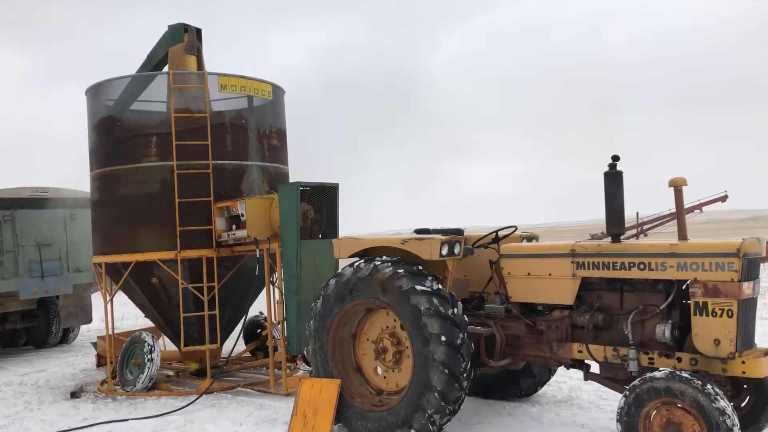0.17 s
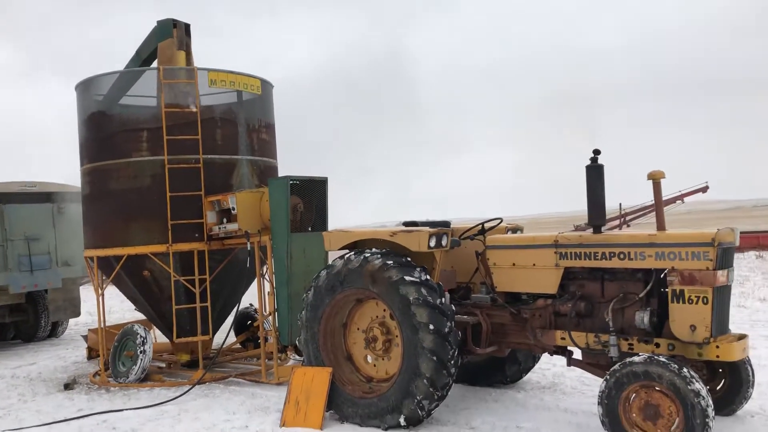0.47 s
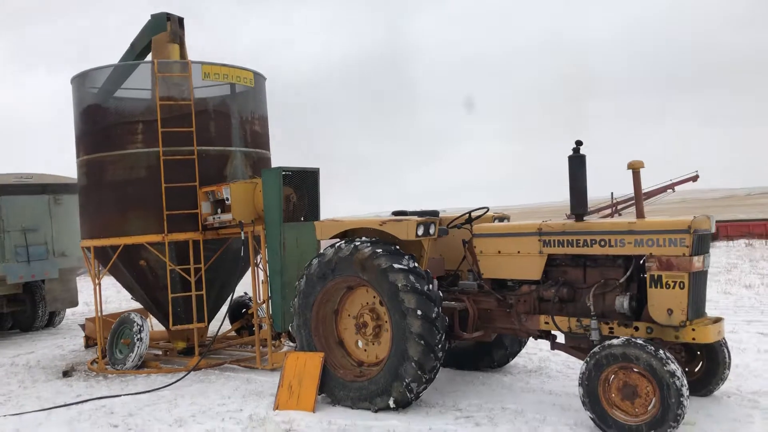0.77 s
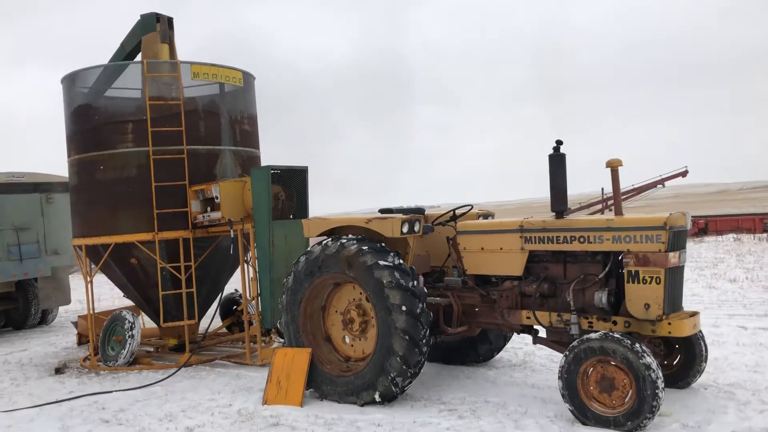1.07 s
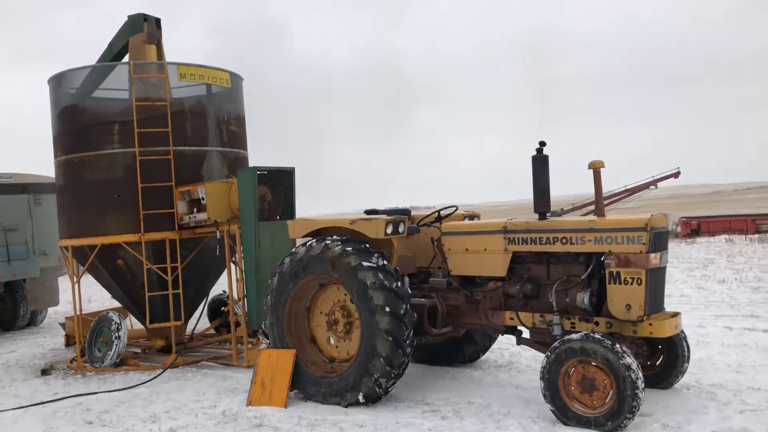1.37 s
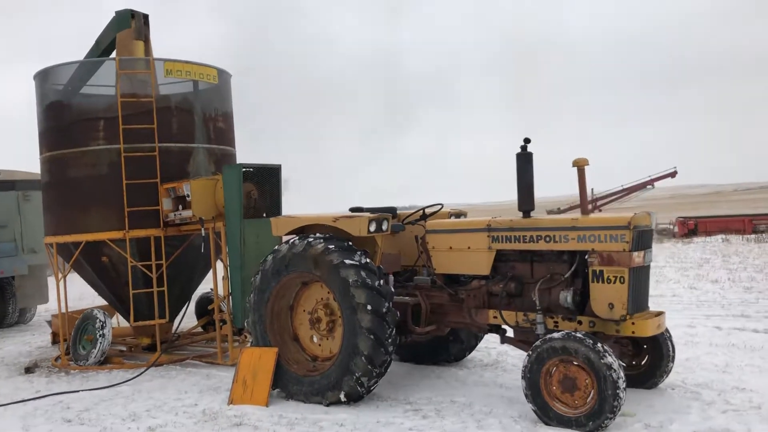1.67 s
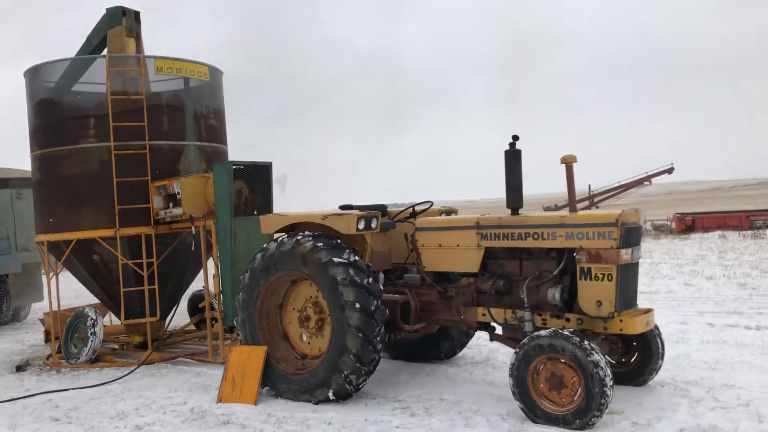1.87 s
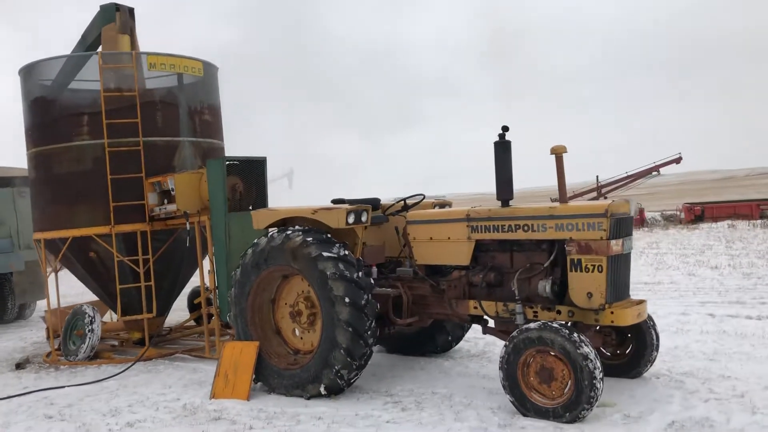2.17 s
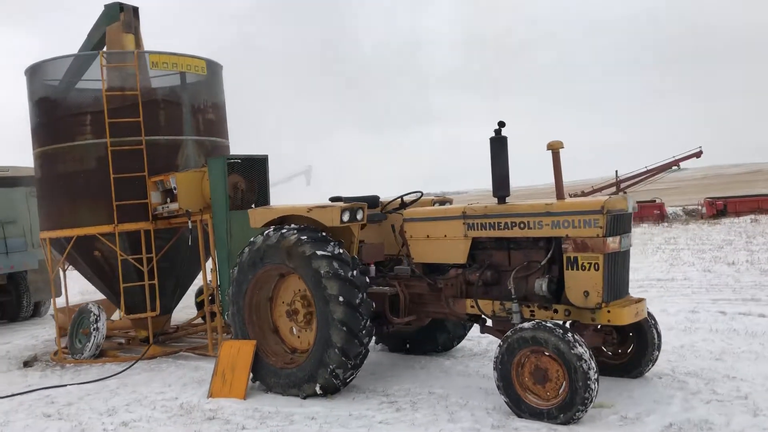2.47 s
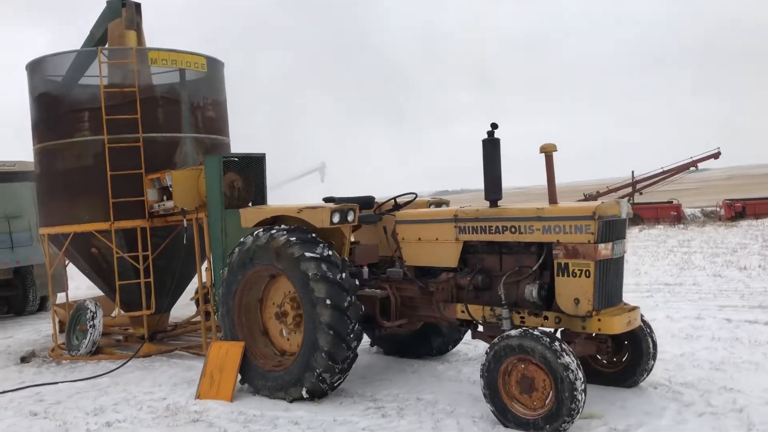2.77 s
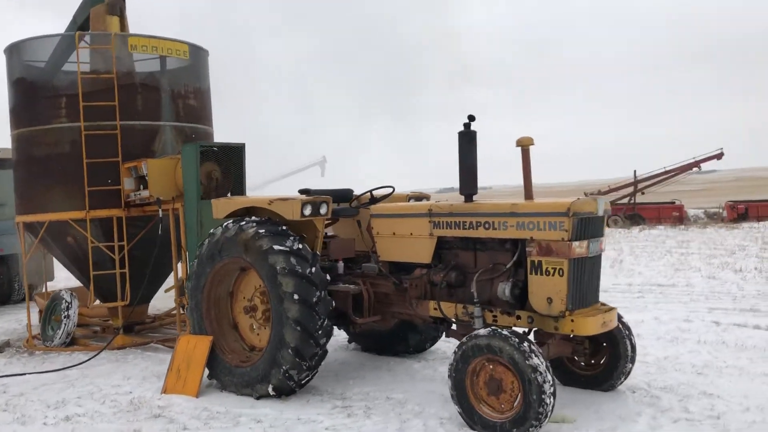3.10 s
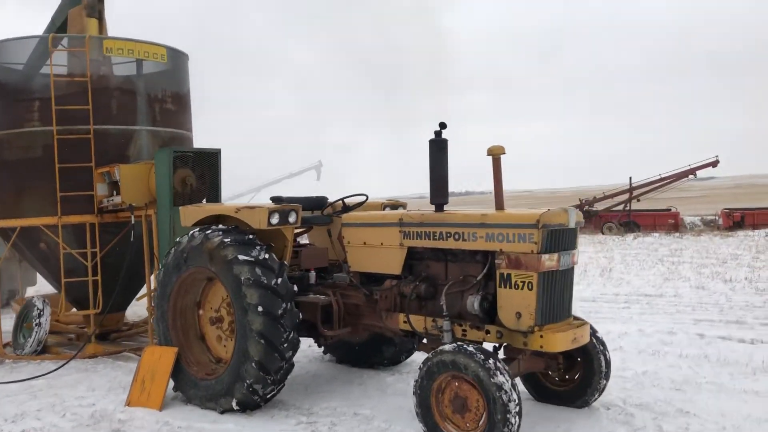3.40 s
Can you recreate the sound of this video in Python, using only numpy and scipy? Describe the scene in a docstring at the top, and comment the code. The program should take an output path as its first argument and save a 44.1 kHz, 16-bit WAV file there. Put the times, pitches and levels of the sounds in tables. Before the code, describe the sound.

An old tractor engine knocks and throbs steadily beside a grain dryer whose fan drones over rushing air and a low burner rumble; sharp metal ticks join, outdoors in an open farmyard, heard by a moving nearby microphone.

```python
"""An old four-cylinder tractor drives a grain dryer in an open, snowy farmyard.
From the start the engine throbs and knocks, while the dryer's fan drones over rushing air and a burner.
Sharp metal ticks, made of short noise bursts, soon join in. Near 1.4 s drone and knocks are weak.
The burner is strongest near 1.75 s and then fades; the knocks return near 1.8 s, then the drone.
Engine tones and knocks are sines; the drone is two fluttering tones; air and burner are shaped noise."""
import sys
import numpy as np
from scipy import signal
from scipy.fft import rfft, irfft
from scipy.io import wavfile

SR = 44100
rng = np.random.default_rng(int(sys.argv[2]) if len(sys.argv) > 2 else 0)


def store_pcm(level_fs):
    """Save levels as 16-bit WAV."""
    pcm = np.round(np.clip(level_fs, -1, 1) * 32767).astype(np.int16)
    wavfile.write(sys.argv[1], SR, np.atleast_2d(pcm).T)


N = 156114  # length of the scene in samples


def amp(db):
    """Turns decibels into a gain."""
    return 10 ** (np.asarray(db) / 20)


def unit(x):
    """Scales a signal to an rms (average strength) of 1."""
    return x / np.sqrt(np.mean(abs(x) ** 2) + 1e-20)


def clock():
    """Gives the time of every sample in seconds."""
    return np.arange(N) / SR


def curve(rows, axis=1):
    """Joins one column of a table by straight lines in time."""
    rows = np.array(rows)
    return np.interp(clock(), rows[:, 0], rows[:, axis])


def noise(spectrum):
    """Makes noise of rms 1; only the shape of the spectrum counts, not its overall level."""
    hz, db = np.transpose(spectrum)
    bins_hz = np.fft.rfftfreq(N, 1 / SR)
    shape_db = np.interp(np.log(bins_hz + 1), np.log(hz), db)
    white = rng.standard_normal(N)
    return unit(irfft(rfft(white) * amp(shape_db), N))


def band(hz, width_hz):
    """Makes noise of rms 1 in one resonance; at 0 Hz it is a slow random drift."""
    off = (np.fft.rfftfreq(N, 1 / SR) - hz) / width_hz
    white = rng.standard_normal(N)
    return unit(irfft(rfft(white) / (1 + 2 * off ** 2), N))


def cycles():
    """Counts the engine cycles turned since the first knock."""
    # engine speed: t/s, four-stroke cycles per second/Hz
    speed = [(0, 9.597), (1.7, 9.597), (2.4, 9.635), (3.54, 9.645)]
    first_cycle_s = .033
    turned = np.cumsum(curve(speed)) / SR
    return turned - np.interp(first_cycle_s, clock(), turned)


def firings():
    """Counts the firings since the first knock: four cylinders fire in each cycle."""
    return 4 * cycles()


def throb(at, sharp):
    """Swells once with every firing, at the given share of the firing interval; rms 1."""
    return unit(np.exp(sharp * np.cos(2 * np.pi * (firings() - at))))


def exhaust_note():
    """Adds sines at multiples of the firing rate to form the low exhaust pulse."""
    # overtones of the pulse: multiple of the firing rate, level/dB
    exhaust = [(1, -53.5), (2, -33), (3, -39.5), (4, -39.5), (5, -43), (6, -35.5), (7, -41.5), (8, -38)]
    pulse_at = -.09  # share of the firing interval
    angle = 2 * np.pi * (firings() - pulse_at)
    # the root of 2 gives each sine the rms of its level
    return sum(amp(db) * np.sqrt(2) * np.sin(multiple * angle) for multiple, db in exhaust)


def engine():
    """Each firing gives a low exhaust pulse, a puff of gas and a clatter of the engine block."""
    # spectrum of the gas puffs: f/Hz, relative level/dB
    puff = [(40, -40), (90, -19), (125, 4), (160, -4), (220, -5), (400, 2), (700, -8), (1400, -11),
            (6000, -55)]
    # spectrum of the block's clatter: f/Hz, relative level/dB
    clatter = [(500, -15), (1100, -25), (1800, 5.5), (2400, -13.5), (3150, -4), (5000, -11.5), (9000, -17),
               (16000, -40)]
    puffs = amp(-31) * noise(puff) * throb(at=0.815, sharp=0.94)
    clatters = amp(-32) * noise(clatter) * throb(at=0.98, sharp=0.66)
    return exhaust_note() + puffs + clatters


def knocks():
    """Three short hollow tones, each in a bell-shaped swell, return in every engine cycle."""
    # knocks: share of the cycle, mean f/Hz, mean level/dB before the slow change, half-width/s
    knock_rows = [(0, 932, -11, .0026), (.47, 1400, -22, .002), (.775, 920, -17, .003)]
    # slow change of all knocks: t/s, level/dB
    knock_level = [(0, 0), (.35, 0), (.8, -2.5), (1.35, -4), (1.6, -3.5), (1.82, .5), (2.25, .5),
                   (2.45, -2.5), (2.75, -.5), (3.54, -3)]
    spread_db, detune_share = .6, .005  # random differences between knocks
    t, turned, out = clock(), cycles(), np.zeros(N)
    for share, hz, db, width_s in knock_rows:
        numbers = np.arange(int(turned[-1]) + 1)
        starts = np.interp(numbers + share, turned, t, right=np.inf)
        for start in starts:
            size, detune = rng.standard_normal(2)
            near = abs(t - start) < 10 * width_s
            u = t[near] - start
            tone = np.sin(2 * np.pi * hz * (1 + detune_share * detune) * u)
            out[near] += amp(db + spread_db * size) * np.exp(-(u / width_s) ** 2) * tone
    return out * amp(curve(knock_level))


def tick_envelope(starts, levels_db):
    """Each tick swells for about a millisecond and leaves a weaker, fading tail."""
    rise_s, tail_db, tail_s = 0.0012, -9, .011
    t = np.arange(SR // 10) / SR
    u = t / rise_s
    swell = u ** 2 * np.exp(2 * (1 - u))
    tail = amp(tail_db) * (1 - np.exp(-u)) * np.exp(-t / tail_s)
    blows = np.zeros(N)
    places = np.clip(np.round(starts * SR).astype(int), 0, N - 1)
    blows[places] = amp(levels_db)
    return signal.fftconvolve(blows, swell + tail)[:N]


def ticks():
    """Loud metal ticks ring and snap as bursts of noise; faint ones snap once per firing."""
    # loud ticks: t/s, peak/dB (not used), ring level/dB and snap level/dB before the gains below
    tick_rows = [(0.1475, -16, -30, -29), (0.3556, -17, -36, -35), (0.5644, -19, -33, -33),
                 (0.7731, -19, -37, -32), (0.8774, -16, -39, -29), (0.9288, -17, -37, -30),
                 (1.0594, -19, -32, -39), (1.2161, -18, -33, -40), (1.3463, -20, -38, -37),
                 (1.5033, -17, -29, -31), (1.8657, -17, -33, -29), (1.9185, -21, -38, -32),
                 (1.9964, -17, -32, -31), (2.0492, -18, -57, -33), (2.127, -16, -28, -32),
                 (2.2823, -16, -26.5, -33), (2.3356, -19, -30, -39), (2.4384, -15, -29, -34),
                 (2.4902, -16, -27.5, -31), (2.6209, -18, -31, -35), (2.699, -17, -28, -34),
                 (2.7761, -18, -27, -32), (2.8539, -17, -31, -35), (2.9068, -18, -31, -34),
                 (2.9841, -20, -34, -40), (3.0619, -20, -33, -35), (3.2181, -16, -26, -38),
                 (3.27, -16, -25.5, -38), (3.425, -14, -31, -27)]
    # spectrum of the ring: f/Hz, relative level/dB
    ring = [(3000, -40), (6500, -9), (7150, 1.5), (8000, -4), (8600, -6), (16000, -28)]
    # spectrum of the snap: f/Hz, relative level/dB
    snap = [(2000, -17), (6000, -2), (9000, -2.5), (13000, -2), (16000, -2.5)]
    ring_gain_db, snap_gain_db = 2, 5
    faint_db, faint_spread_db = -46, 4
    starts, _, ring_db, snap_db = np.transpose(tick_rows)
    fired = firings()
    # halfway between whole firing counts
    faint_starts = np.interp(np.arange(int(fired[-1])) - .5, fired, clock())
    faint_levels_db = faint_db + faint_spread_db * rng.standard_normal(len(faint_starts))
    faint = tick_envelope(faint_starts, faint_levels_db)
    loud_ring = tick_envelope(starts, ring_db + ring_gain_db)
    loud_snap = tick_envelope(starts, snap_db + snap_gain_db)
    return noise(ring) * loud_ring + noise(snap) * (loud_snap + faint)


def flutter():
    """Wanders at random in strength and phase, as turbulent air makes a tone do; rms about 1."""
    width_hz = 14
    return (band(0, width_hz) + 1j * band(0, width_hz)) / np.sqrt(2)


def fan():
    """The passing blades give a tone and its octave, both fluttering in turbulent air."""
    # blade-pass tone: t/s, f/Hz
    fan_pitch = [(0.0, 352.7), (0.06, 348.5), (0.16, 347.8), (2.02, 348.1), (2.57, 349.3), (2.66, 347.9),
                 (3.54, 349.4)]
    # drone before its flutter: t/s, level/dB
    fan_level = [(0.0, -15), (0.15, -13.5), (0.2, -20.5), (0.24, -16.5), (0.37, -21.5), (0.53, -13.5),
                 (1.11, -14), (1.3, -21.5), (1.37, -18), (1.5, -23), (1.54, -21), (1.57, -21), (1.83, -17),
                 (2.24, -15.5), (2.35, -11.5), (2.8, -14), (3.38, -10.5), (3.54, -13.5)]
    # octave before its flutter: t/s, level/dB
    octave_level = [(0, -24.5), (.45, -30), (1.1, -28.5), (1.8, -26.5), (2.6, -26), (3.3, -26.5),
                    (3.54, -27)]
    turn = np.exp(2j * np.pi * np.cumsum(curve(fan_pitch)) / SR)
    drone = amp(curve(fan_level)) * turn * (1 + .09 * flutter())
    # squaring the turning tone doubles its pitch
    octave = amp(curve(octave_level)) * turn ** 2 * (1 + 0.29 * flutter())
    return np.sqrt(2) * (drone - octave).real


def panels(x):
    """Sheet metal adds one quick echo; its delay shrinks as the listener walks."""
    echo_db, delay_s, shrink_s_per_s = -22.5, .0031, 0.000191
    t = clock()
    echo = np.interp(t - delay_s + shrink_s_per_s * t, t, x)
    return unit(x + amp(echo_db) * echo)


def air_rush():
    """Air rushes through the dryer as shaped noise; its body and treble flicker separately."""
    # spectrum of the rush: f/Hz, relative level/dB
    rush_spectrum = [(60, -49), (165, -15.5), (200, 0.5), (260, -0.5), (290, -2), (320, -0.5), (380, -5.5),
                     (460, -10.5), (560, -3.5), (660, -2), (820, -5.5), (1200, -8), (1900, -7.5),
                     (2400, -10), (3200, -11.5), (4200, -14), (5600, -18.5), (7000, -21), (9000, -25.5),
                     (12000, -31), (16000, -32.5)]
    # slow changes before the flicker: t/s, body level/dB, treble level/dB
    rush_level = [(0, 2, 0.7), (.7, 0.5, -0.5), (1.4, -1, 0.5), (2, 0, 0.5), (2.55, 0, -1.8),
                  (3.2, 1, -0.5), (3.54, 1, 0)]
    treble_from_hz, flicker_width_hz = 2310, 20
    air = amp(-19) * panels(noise(rush_spectrum))
    lowpass = signal.butter(2, treble_from_hz, fs=SR, output="sos")
    body = signal.sosfiltfilt(lowpass, air)
    treble = air - body
    body_db = curve(rush_level) + .2 * band(0, flicker_width_hz)
    treble_db = curve(rush_level, axis=2) + .25 * band(0, flicker_width_hz)
    return body * amp(body_db) + treble * amp(treble_db)


def housing():
    """Air and grain keep the steel housing ringing: narrow bands of noise, some swelling in passing."""
    # resonances: f/Hz, width/Hz, level/dB before the swell, t/s when loudest (may lie outside the scene)
    resonances = [(655, 21, -39.5, 0.9), (934, 43, -32, 6), (1043, 31, -36, 3.3), (1293, 33, -45.5, 2.5),
                  (1737, 93, -36.5, -1.5), (1820, 110, -37.5, -2.2), (1980, 130, -38.5, 8),
                  (2640, 69, -43, -4), (3154, 96, -36.5, 2.7), (3930, 180, -45, 7), (4200, 120, -45, 2.5),
                  (7060, 700, -47, 8.5)]
    swell_db, swell_s = 2.5, 0.47  # height and half-width as the listener walks by
    t, out = clock(), np.zeros(N)
    for hz, width_hz, db, loudest_s in resonances:
        swell = np.exp(-((t - loudest_s) / swell_s) ** 2)
        out += amp(db + swell_db * swell) * band(hz, width_hz)
    return out


def burner():
    """The burner rumbles as low noise that grows and then fades."""
    # spectrum of the rumble: f/Hz, relative level/dB
    burner_spectrum = [(10, -32), (28, -33), (40, -23), (52, -9), (64, -7), (74, 4), (85, 6.5), (105, 4),
                       (135, -5.5), (170, -17), (400, -42.5)]
    # slow change of the rumble: t/s, level/dB before the base level below
    burner_level = [(0, -5), (.3, -1.5), (1.75, 3), (2.4, -1), (3.54, -8)]
    base_db = -29.5
    return amp(base_db + curve(burner_level)) * noise(burner_spectrum)


def dryer():
    """Air rushes through the ringing housing over the rumbling burner."""
    return air_rush() + housing() + burner()


def scene():
    """Tractor and dryer stand side by side in the open air; their sounds add up in one channel."""
    return (engine() + knocks() + ticks() + fan() + dryer())[None]


def record(dry):
    """A steep lowpass removes the highest treble, above about 15.8 kHz."""
    lowpass = signal.firwin(801, 15800, window=("kaiser", 9), fs=SR)
    return signal.oaconvolve(dry, lowpass[None], "same")


dry = scene()
out = record(dry)
store_pcm(out)
```